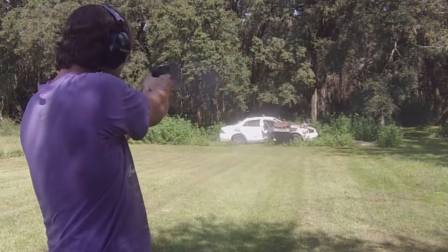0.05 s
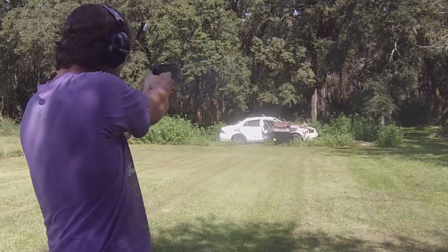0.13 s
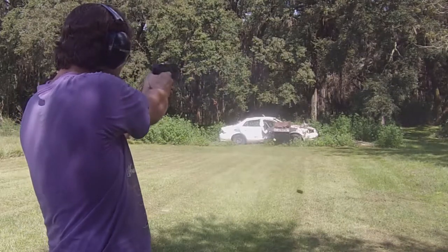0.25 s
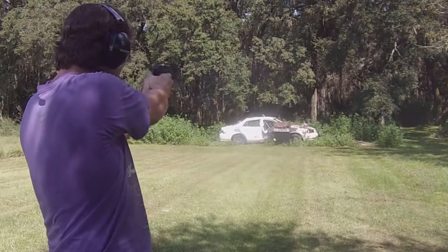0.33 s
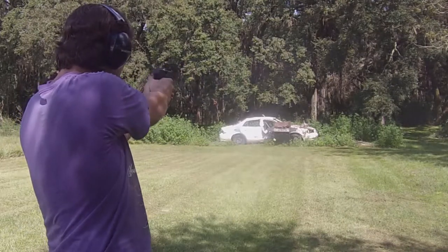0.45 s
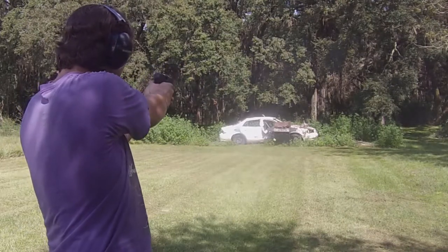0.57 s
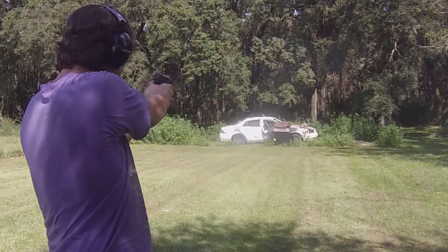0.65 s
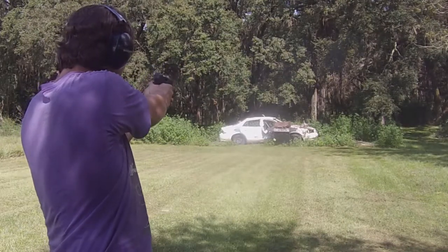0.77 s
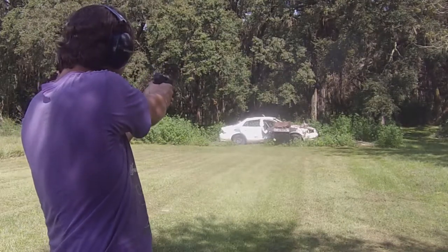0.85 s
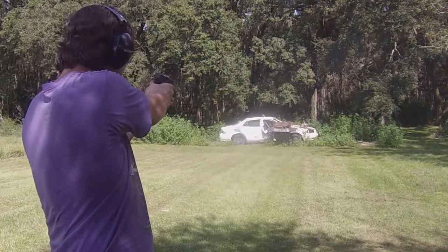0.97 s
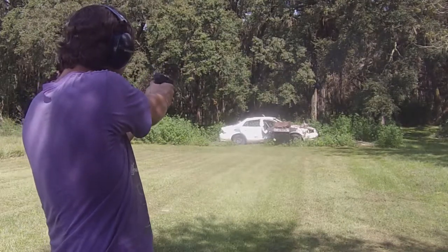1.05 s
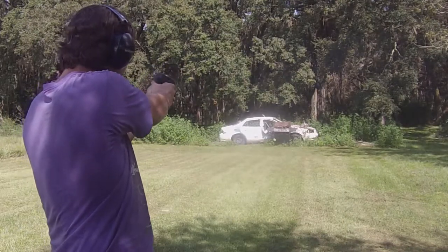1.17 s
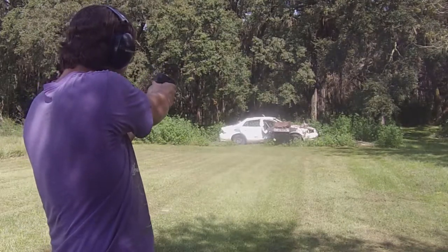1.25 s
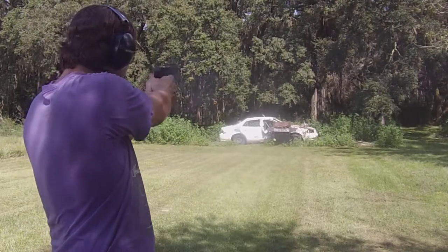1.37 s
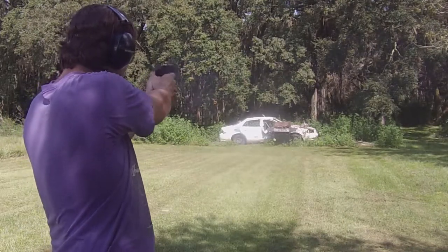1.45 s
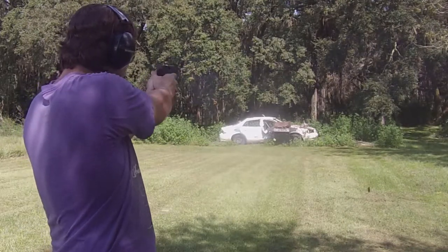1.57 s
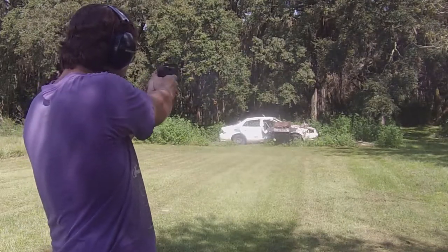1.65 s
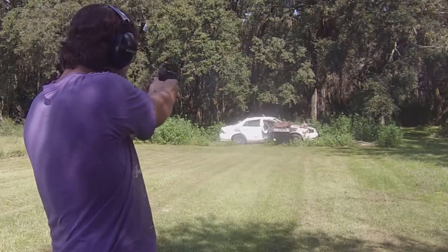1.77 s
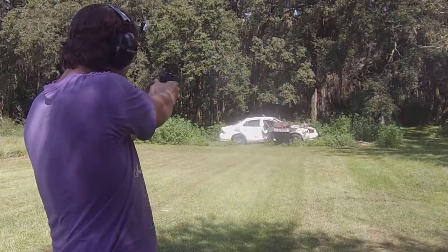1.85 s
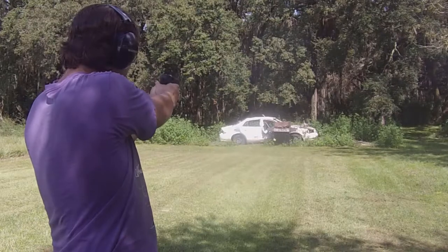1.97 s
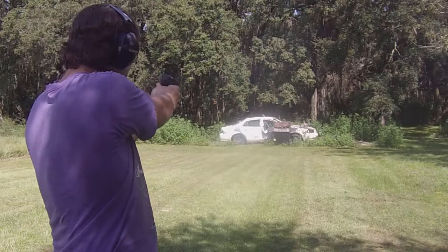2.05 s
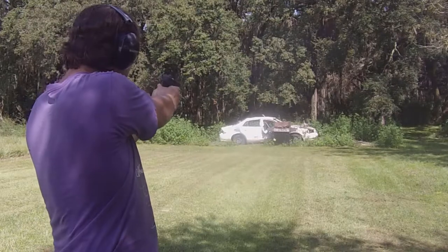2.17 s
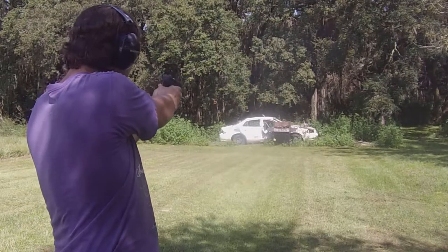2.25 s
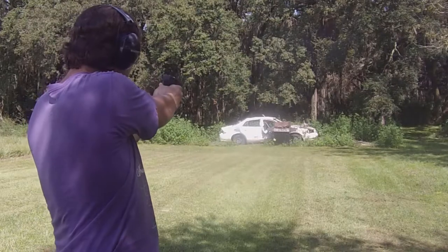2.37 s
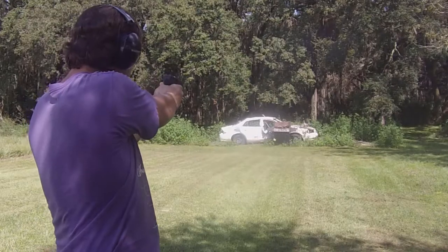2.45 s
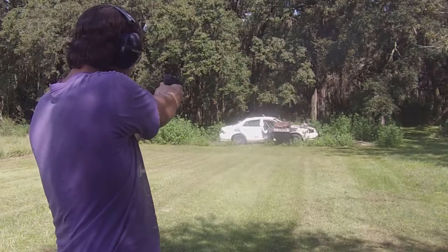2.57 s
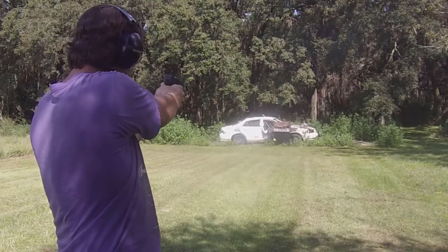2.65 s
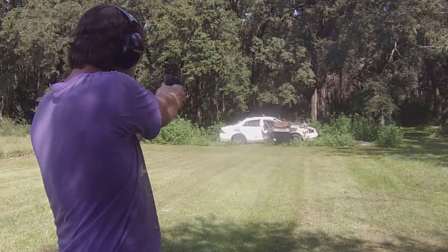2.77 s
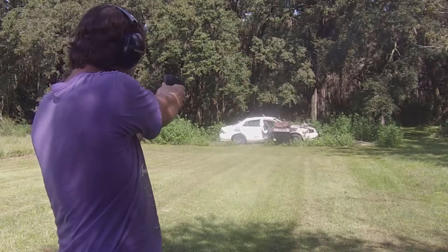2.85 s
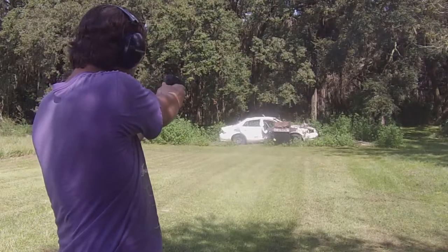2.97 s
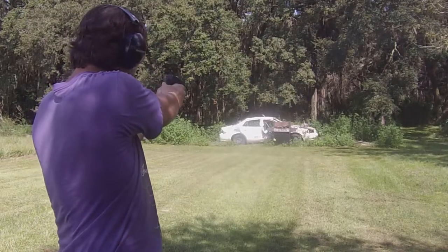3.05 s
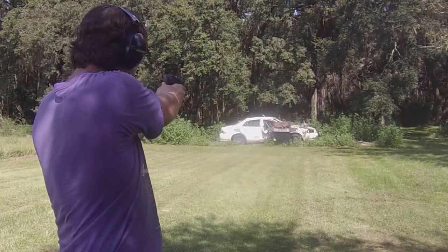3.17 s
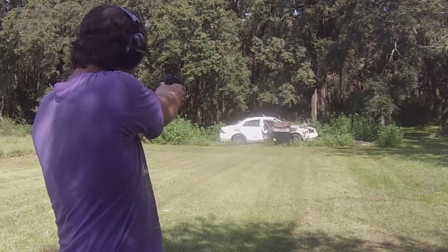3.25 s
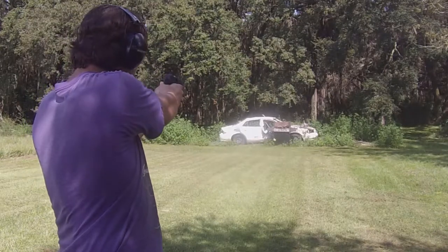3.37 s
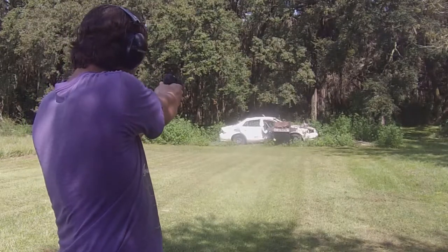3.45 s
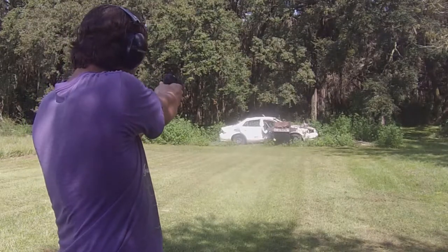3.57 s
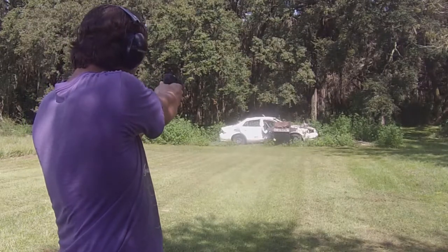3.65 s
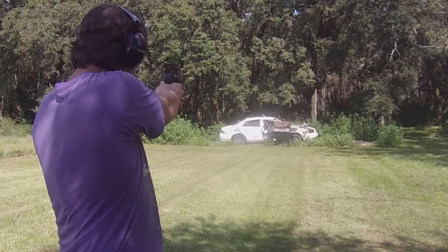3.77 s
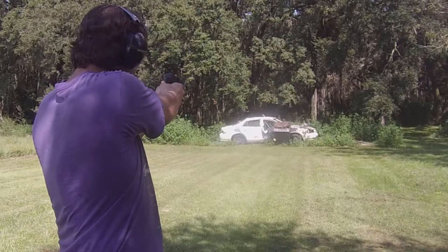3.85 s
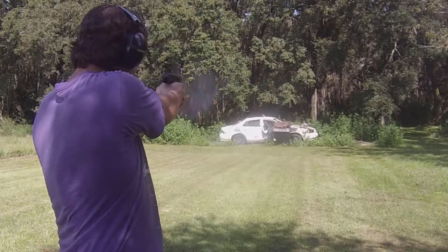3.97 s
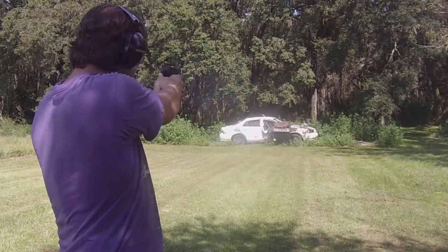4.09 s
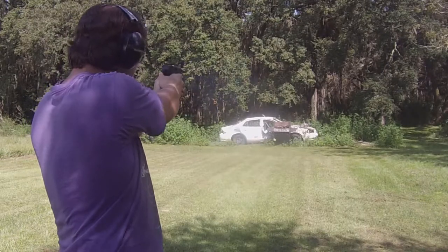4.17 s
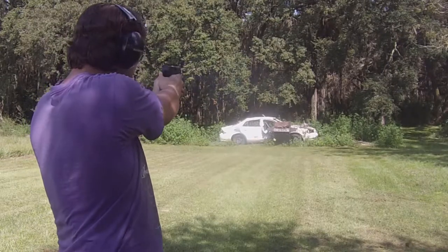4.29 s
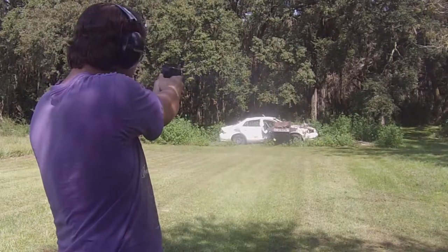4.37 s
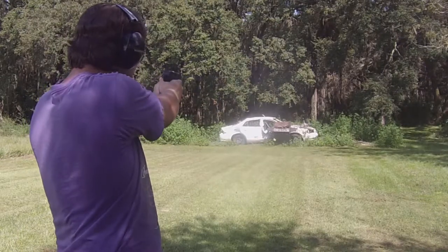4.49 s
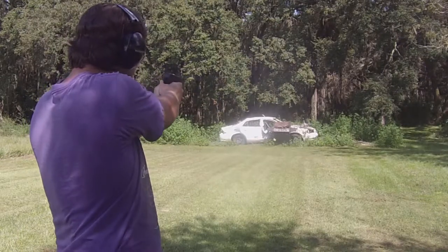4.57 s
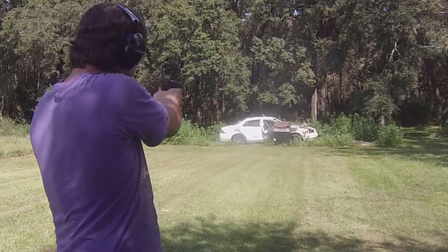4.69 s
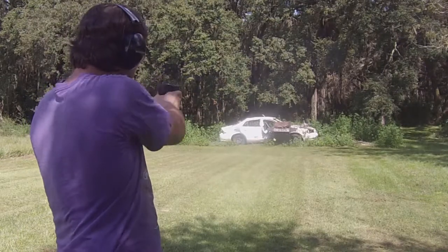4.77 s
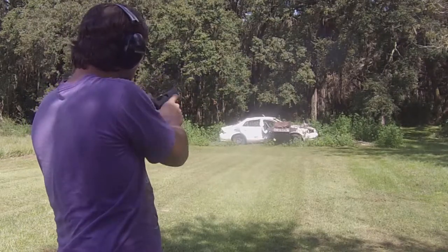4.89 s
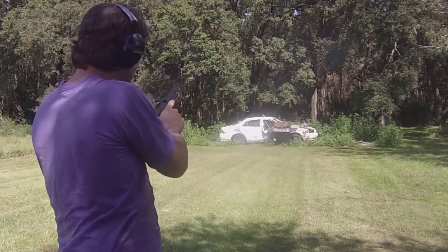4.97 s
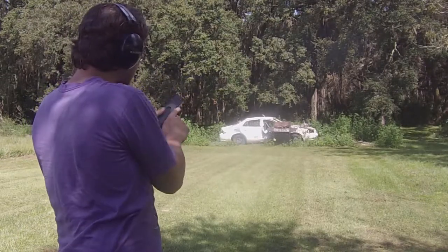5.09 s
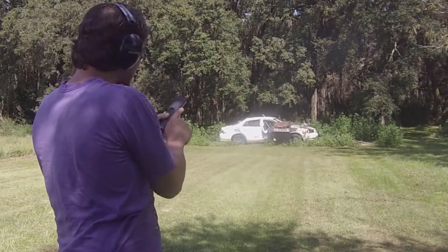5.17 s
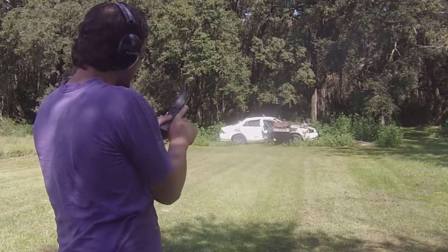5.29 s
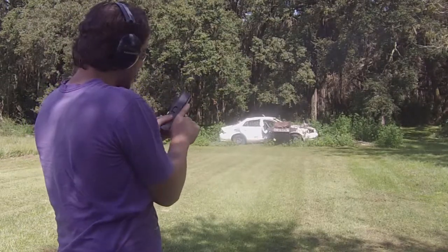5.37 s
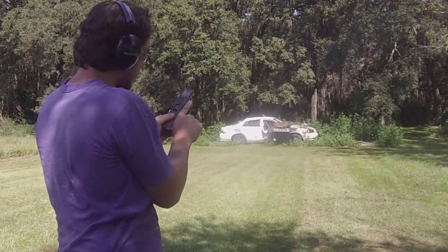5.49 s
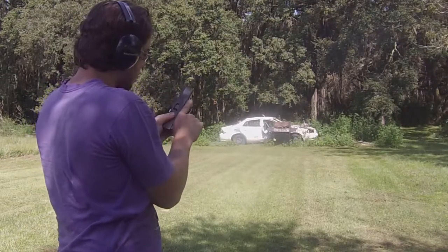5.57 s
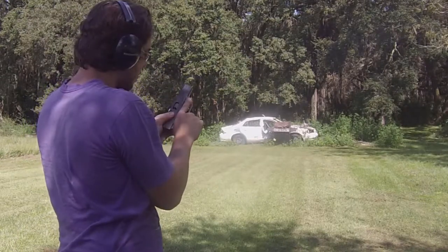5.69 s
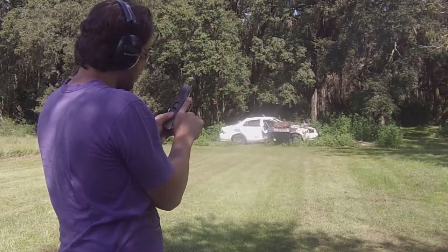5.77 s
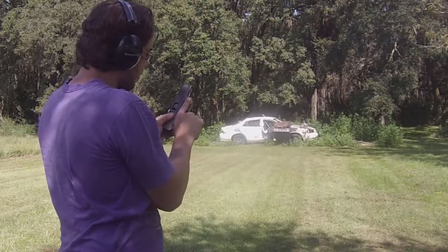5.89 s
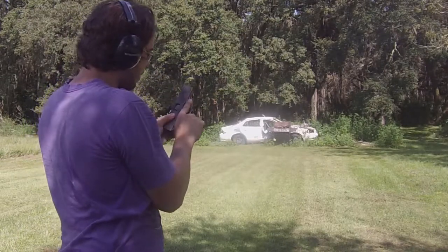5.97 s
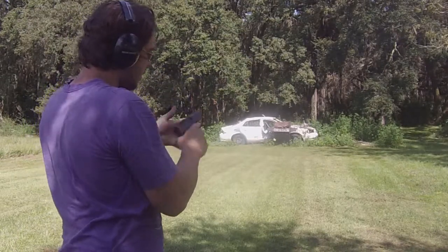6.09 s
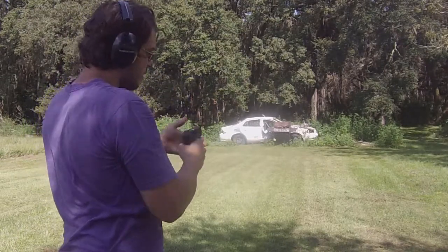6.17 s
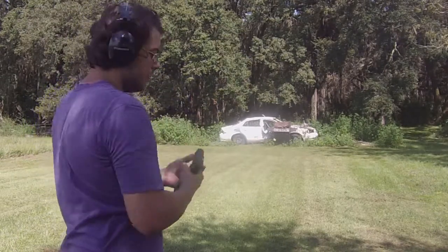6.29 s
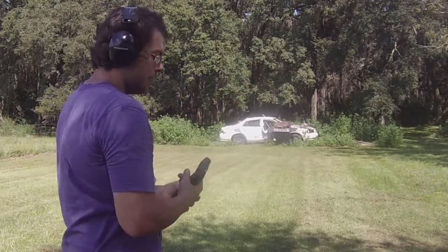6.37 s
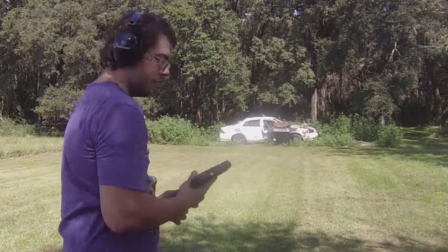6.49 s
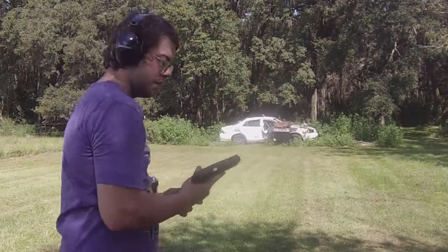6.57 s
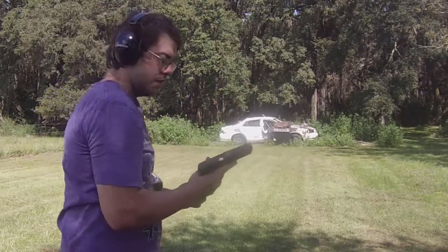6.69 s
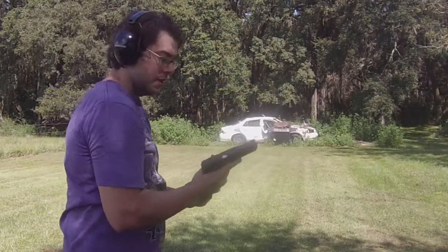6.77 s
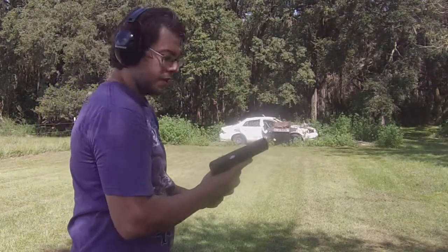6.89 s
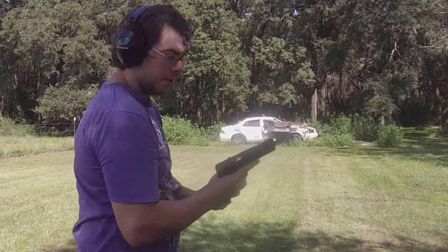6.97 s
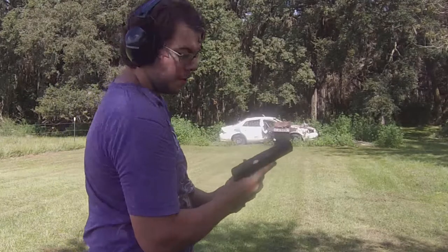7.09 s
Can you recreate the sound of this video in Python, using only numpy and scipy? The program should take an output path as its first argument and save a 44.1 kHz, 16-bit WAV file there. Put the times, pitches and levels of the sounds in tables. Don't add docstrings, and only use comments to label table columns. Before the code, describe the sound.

Harsh, clipped handgun blasts outdoors, echoes rattling off trees and a car, then a sharp slide click over faint insects and wind.

```python
import sys
import numpy as np
from scipy import signal
from scipy.io import wavfile
from scipy.ndimage import uniform_filter1d

SR = 44100
rng = np.random.default_rng(int(sys.argv[2]) if len(sys.argv) > 2 else 0)


def gain_from_decibels(decibels):
    exponent = np.asarray(decibels, float) / 20
    return 10 ** exponent


def dump_mix(stems):
    frames = np.atleast_2d(stems).T
    limited = np.clip(frames, -1, 1)
    pcm = np.round(limited * 32767).astype(np.int16)
    wavfile.write(sys.argv[1], SR, pcm)


N = 314852


def noise(count):
    return rng.standard_normal(count)


def evened(x):
    return x / np.sqrt(np.mean(x ** 2) + 1e-20)


def read(points, x):
    place, value = np.transpose(points)
    return np.interp(np.log(x + 1), np.log(place + 1), value)


def add(mix, s, sound):
    start = round(s * SR)
    skipped = max(-start, 0)
    part = mix[max(start, 0):][:max(len(sound) - skipped, 0)]
    part += sound[skipped:][:len(part)]


def band(x, order, low_hz, high_hz):
    return signal.sosfilt(signal.butter(order, [low_hz, high_hz], "bandpass", fs=SR, output="sos"), x)


def colour(x, spectrum, loss, size):
    hz, t, z = signal.stft(x, SR, nperseg=size)
    shape = evened(gain_from_decibels(read(spectrum, hz)))
    loss_db = read(loss, hz)[:, None] * (t - 1 / 4)
    return signal.istft(z * gain_from_decibels(-loss_db) * shape[:, None], SR, nperseg=size)[1][:len(x)]


def rings(modes, t):
    return sum(gain_from_decibels(db - 60 * t / t60) * np.sin(2 * np.pi * hz * t) for hz, db, t60 in modes)


def struck(modes, length):
    t = np.arange(4000) / SR
    count = round(length * SR)
    scrape = noise(2000)[:count] * signal.windows.tukey(count, .3)
    return signal.fftconvolve(scrape / np.linalg.norm(scrape), rings(modes, t))


# pitch in Hz, strength in dB per Hz.
WASH_COLOUR = [(70, -8), (110, 0.5), (160, -10), (330, -12.5), (1100, -23.5), (2000, -26), (5000, -33.5),
               (9000, -38.5), (12000, -41.5), (15500, -41)]


def far_wash():
    return gain_from_decibels(-42.5) * evened(colour(noise(N), WASH_COLOUR, [(100, 0.008), (200, 0.02)], size=1024))


# pitch in Hz, strength in dB per Hz.
INSECT_COLOUR = [(9000, -35), (9900, 0), (10500, 0), (11000, 0), (11500, -37.5)]


def insects():
    return gain_from_decibels(-67) * evened(colour(noise(N), INSECT_COLOUR, [(100, 0), (200, 0.0068)], size=256))


def engine_hum():
    hum_hz, hum_db = 80.6, -41.5
    pitch_waver, level_waver = evened(uniform_filter1d(rng.standard_normal((2, N)), 2500))
    turns = np.cumsum(hum_hz + 2.2 * pitch_waver) / SR
    return np.sqrt(2) * gain_from_decibels(hum_db + 2.5 * level_waver) * np.sin(2 * np.pi * turns)


# peak in seconds, level in dB, swell in seconds, drop in seconds.
GUSTS = [
    (.7, -41, .1, 0.136),
    (1.2, -35, .25, .08),
    (1.62, -33, 0.1, .08),
    (3.1, -35.5, 0.33, 0.15),
    (3.96, -26, 0.22, 0.032),
]


def breeze():
    t = np.arange(N) / SR
    lull_db, lumps_db = -45, 1.5
    power = gain_from_decibels(lull_db + lumps_db * evened(uniform_filter1d(noise(N), size=6000))) ** 2
    for s, db, swell, drop in GUSTS:
        shape = np.where(t < s, (s - t) / swell, (t - s) / drop)
        power = power + gain_from_decibels(db) ** 2 * np.exp(-2 * shape)
    return np.sqrt(power)


def wind():
    return evened(band(noise(N), 2, 14, 55)) * breeze()


def air():
    return far_wash() + insects() + engine_hum() + wind()


# pitch in Hz, level in dB, time to die by 60 dB in seconds.
SLIDE = [(1430, -36, 0.0076), (1840, -8, 0.011), (2450, -9.5, 0.0063), (3460, -5.5, 0.0087),
         (3926, -3.5, 0.0085), (4760, -6.5, 0.0073), (5610, -25, 0.037), (6320, -12, 0.0061),
         (8100, -7, 0.00605), (9370, -16, 0.008), (11400, -24, 0.0061)]
# pitch in Hz, level in dB, time to die by 60 dB in seconds.
SPRING = [(3300, -8, .006), (3900, -1.5, .008), (4440, -1, 0.022), (5620, -12, .06), (8300, 0, .005),
          (11600, 0, .008)]
# start in seconds, level in dB, scrape length in seconds, brightness in dB per octave.
CLICKS = [(6.0278, -7, 0.00075, -2.5), (6.0283, -8.5, 0.00059, 5.5), (6.0299, -10.5, 0.0009, 1),
          (6.0323, -14.5, 0.0038, -5), (6.019, -33.5, .002, 8), (6.145, -36, .02, -4.5),
          (5.0784, -39, 0.0017, 3), (5.258, -41, .002, 0), (5.3581, -41.5, .002, 3),
          (5.612, -46, 0.0024, 6.5), (5.9739, -42.5, .002, 1), (6.39, -50, 0.0054, 8),
          (6.76, -48, 0.0034, 9)]


def slide_clicks():
    out = np.zeros(N)
    for s, db, length, tilt_db in CLICKS:
        modes = [(hz, db + mode_db + tilt_db * np.log2(hz / 3000), t60) for hz, mode_db, t60 in SLIDE]
        add(out, s, struck(modes, length))
    spring_s, spring_db = 6.041, -32
    add(out, spring_s, gain_from_decibels(spring_db) * struck(SPRING, 0.03))
    return band(out, 3, 1100, 11500)


# pitch in Hz, level in dB, time to die by 60 dB in seconds.
CASE = [(900, -13, 0.032), (1467, 6, 0.072), (2210, 3, 0.0052), (3290, -8, 0.0065), (4240, 1.5, 0.0052),
        (6380, -12, 0.0044), (9400, -26, 0.0065), (13300, -17, .004)]


def spent_case():
    out = np.zeros(N)
    case_s, case_db = .4565, -3.5
    add(out, case_s, gain_from_decibels(case_db + 1.0) * struck(CASE, 0.0035))
    add(out, case_s + 0.00127, gain_from_decibels(case_db) * struck(CASE, 0.00092))
    return out


EDGE_S = .232

# delay in seconds, low part in dB, bright part in dB, time to die by 60 dB in seconds.
SLAPS = [(.056, -28, -51, 0.048), (.085, -16, -42.5, 0.061), (.0904, -8, -26, 0.12),
         (0.1067, -23, -13, 0.2), (.175, -12, -31, .044), (.218, -1, -13, 0.0364), (0.234, -3, -21, .04),
         (0.2377, 9, -23.5, 0.049), (0.2522, 5, -28.5, 0.02), (.29, -5, -25, 0.27),
         (.7845, -22, -46, 0.0186)]


def envelope(rule, delay, axis):
    near_db, near_fall, climb, edge, top_db, deep, fade, far_db, far_fade = rule
    knee_s = 0.032
    faded_db = fade * knee_s * np.logaddexp(0, (delay - deep) / knee_s)
    inside = gain_from_decibels(top_db - faded_db) ** 2 + gain_from_decibels(far_db - far_fade * delay) ** 2
    field_db = -9.5 * (axis == 1)
    before_db = np.where(delay < EDGE_S, field_db, 0) - climb * np.maximum(edge - delay, 0)
    power = gain_from_decibels(near_db - near_fall * delay) ** 2 + inside * gain_from_decibels(before_db) ** 2
    for slap in SLAPS:
        since = delay - slap[0]
        power = power + (since > 0) * gain_from_decibels(slap[axis] - 60 * np.maximum(since, 0) / slap[3]) ** 2
    return np.sqrt(power)


# pitch in Hz, strength in dB per Hz.
LEAF_COLOUR = [(800, -12), (1600, 6), (2500, 2.5), (4000, 0.5), (7000, -5.5), (11000, -15.5), (15500, -33),
               (17000, -31)]
# pitch in Hz, loss in dB per second.
AIR_LOSS = [(1500, -4), (3000, 10), (6000, 20), (10000, 42.5), (15000, 111)]
# ground scatter in dB, its fall in dB per second,
# climb in dB per second, edge in seconds, top in dB, fade start in seconds, fade in dB per second,
# far wood in dB, its fade in dB per second.
LEAVES = (-3, 421, 160, -0.04, -19.5, 0.3659, 41, -55, 15)


def leaf_hiss(delay):
    flutter = gain_from_decibels(2.0 * evened(uniform_filter1d(noise(len(delay)), 200)))
    hiss = colour(noise(len(delay)), LEAF_COLOUR, AIR_LOSS, size=256)
    return hiss * flutter * envelope(LEAVES, delay, axis=2)


# delay in seconds, peak in dB.
REFLECTORS = [(0.0579, -13), (.0999, 8), (0.1775, -28), (.2189, -1.5), (0.2412, -2), (0.255, -12.5),
              (0.2994, 9), (.3088, 2.5), (.3194, 2.5), (.3678, -5), (.3839, 6), (.4074, 4), (0.445, -6),
              (0.4562, 11.5), (0.4837, -2), (.5515, 1.5), (.566, -1.5), (0.6028, -5), (0.662, -4),
              (0.6875, -7.5), (.7849, -7)]


def single_faces(count):
    gap_s, trunk_db, fade_db_per_s, deep_s = .024, -6.5, 35, 0.47
    place, size = rng.random((count, 2)).T
    s = EDGE_S + .04 + gap_s * (np.arange(count) + place)
    db = trunk_db - 8.3 * size - fade_db_per_s * np.maximum(s - deep_s, 0)
    return list(zip(s, db)) + REFLECTORS


# pitch in Hz, strength in dB per Hz.
WOOD_COLOUR = [(40, -54), (70, -18), (100, -12.5), (170, -6.5), (225, -16.5), (310, -9), (600, -0.5),
               (1300, -5), (1500, -10), (1850, -15.5), (2350, -14.5), (2850, -22), (5000, -36),
               (7000, -57.5)]
# pitch in Hz, loss in dB per second.
WOOD_LOSS = [(60, -11), (150, 25.5), (300, 7.5), (500, 5.5), (900, 0.5), (1500, 5.5), (2500, 6.5),
             (3200, 9)]
# pitch in Hz, strength in dB per Hz.
BARK_COLOUR = [(1200, -33), (2000, 4), (3000, 24), (4500, -21), (8000, -24), (12000, -40)]
# ground scatter in dB, its fall in dB per second,
# climb in dB per second, edge in seconds, top in dB, fade start in seconds, fade in dB per second,
# far wood in dB, its fade in dB per second.
WOOD = (-2.5, 422, 209, 0.0735, -7.5, 0.4439, 34.5, -11, 14.5)


def wood(delay):
    field = noise(len(delay)) * envelope(WOOD, delay, axis=1)
    ticks = np.zeros(len(delay))
    faces = single_faces(count=30)
    for (s, db), lag in zip(faces, rng.random((len(faces), 3))):
        field[round((s - .006) * SR):round((s - .0015) * SR)] *= gain_from_decibels(-3.5)
        ticks[round((s - .001) * SR)] = gain_from_decibels(db - 18.0)
        lateness = np.cumsum([0, *(0.000405 + 0.00157 * lag)])
        for k, late in enumerate(lateness):
            field[round((s + late - .001) * SR)] += (-1) ** k * gain_from_decibels(db + 8.5 - 2.7 * k)
    blur = colour(field, WOOD_COLOUR, WOOD_LOSS, size=512)
    return blur + colour(ticks, BARK_COLOUR, AIR_LOSS, size=256)


# pitch in Hz, level in dB, time to die by 60 dB in seconds.
CAR_BODY = [(452, -4, .04), (765, -.5, .04), (1150, -2, .04), (1680, -9, .017)]
# pitch in Hz, level in dB, time to die by 60 dB in seconds.
CAR_PANELS = [(1136, -9, 0.0043), (1830, 3.5, 0.014), (2590, 4.5, 0.019), (3400, -6, .007)]


def car(delay):
    out, t = np.zeros(len(delay)), delay[:4000]
    body_s, far_end_s, panels_s = .0918, .0975, .1085
    add(out, body_s, -rings(CAR_BODY, t))
    add(out, far_end_s, gain_from_decibels(-8) * rings(CAR_BODY[1:], t))
    add(out, panels_s, gain_from_decibels(-3.0) * struck(CAR_PANELS, .001))
    add(out, panels_s + 0.0026, gain_from_decibels(-3.0) * struck(CAR_PANELS, 0.0122))
    return out


def fixed_echo(delay):
    echo = wood(delay) + car(delay)
    bass = signal.sosfiltfilt(signal.butter(2, 183, fs=SR, output="sos"), echo)
    return echo - bass * np.clip((EDGE_S - delay) / 0.0335, 0, 1)


CRACK_ENDS_S = .0024


def muzzle_crack(t):
    rough = uniform_filter1d(noise(600), size=3) + 1.2 * uniform_filter1d(noise(600), size=12)
    level = gain_from_decibels(15.0 - 9000 * np.maximum(t - CRACK_ENDS_S, 0))
    rise_s = .0007
    return level * np.clip(t / rise_s, 0, 1) ** 2 * evened(rough)


# start in seconds, suction length in seconds, rebound height (full scale 1),
# gain-control duck in dB, ground bounce in dB.
SHOTS = [
    (-.0109, 0.0067, 1.6, 21, -10),
    (1.314, 0.0075, 1.27, 20.5, 8),
    (3.9892, .0068, 1.1, 12, 4.5),
]


def shots():
    delay = np.arange(round(3.1 * SR)) / SR
    t = delay[:600]
    out, echo = np.zeros(N), fixed_echo(delay)
    for s, suction, _, _, bounce_db in SHOTS:
        add(out, s, echo + leaf_hiss(delay))
        add(out, s - .0045, gain_from_decibels(-26.0 + 480 * t[:200]) * noise(200))
        add(out, s, muzzle_crack(t))
        bounce = evened(uniform_filter1d(noise(600), size=9))
        add(out, s + suction + .0003, gain_from_decibels(bounce_db - 1300 * t) * bounce)
    return out


def scene():
    t = np.arange(N) / SR
    held_db = sum((t > s) * 4.8 * np.exp(-np.maximum(t - s, 0) / 0.22) for s, *_ in SHOTS)
    mono = shots() + slide_clicks() + spent_case() + air() * gain_from_decibels(-held_db)
    return np.array([mono, mono])


def gain_duck(t):
    duck_db = np.zeros(N)
    for s, _, _, depth_db, _ in SHOTS:
        after = np.maximum(t - s, 0)
        duck_db += (after > CRACK_ENDS_S) * depth_db * np.exp(-after / 0.15)
    return duck_db


# seconds after the rebound starts, depth (full scale 1).
SAGS = [
    (.0008, 0.403),
    (.0013, 1.9),
]


def capsule_push(t):
    push = np.zeros(N)
    for s, suction, rebound, _, _ in SHOTS:
        after = np.maximum(t - s, 0)
        stuck = -.4 * np.clip(after / .0005, 0, 1) - 4 * np.clip((after - .002) / .001, 0, 1)
        held = rebound * np.clip(.5 + (after - suction) / .0012, 0, 1)
        held -= sum(deep * np.exp(-((after - suction - late) / 0.00016) ** 2) for late, deep in SAGS)
        creep = 0.79 * np.exp(-(after - .016) / 0.0077)
        push += np.where(after < suction, stuck, np.where(after < .016, held, creep))
    return push


def channel_difference(mid, duck_db):
    leak = gain_from_decibels(-25) * duck_db / 10 * uniform_filter1d(np.roll(mid, 40) - mid, size=30)
    faint = signal.firwin(61, 9800, fs=SR)
    return leak + gain_from_decibels(-64) * signal.oaconvolve(noise(N), faint, "same")


def band_limit(x):
    return signal.sosfilt(signal.butter(12, 15970, fs=SR, output="sos"), x)


def record(dry):
    t = np.arange(N) / SR
    duck_db = gain_duck(t)
    treble_edge = signal.firwin(101, 15300, fs=SR)
    heard = signal.oaconvolve(dry[0] * gain_from_decibels(-duck_db), treble_edge, "same")
    mid = np.clip(heard + capsule_push(t), -1, 1)
    side = channel_difference(mid, duck_db)
    mix = np.clip([mid + side, mid - side], -1, 1)
    return band_limit(mix)


dry = scene()
out = record(dry)
dump_mix(out)
```